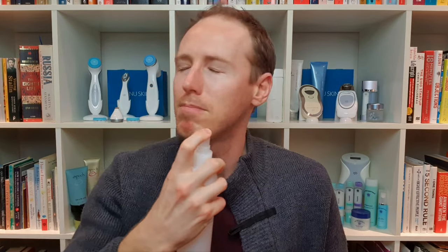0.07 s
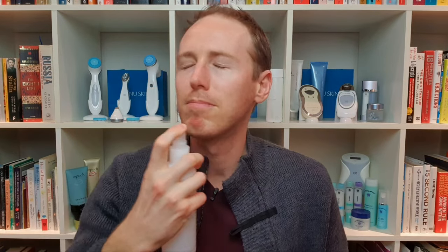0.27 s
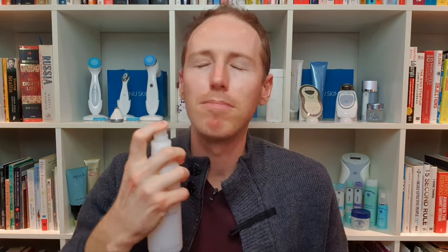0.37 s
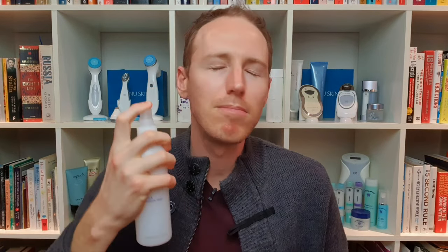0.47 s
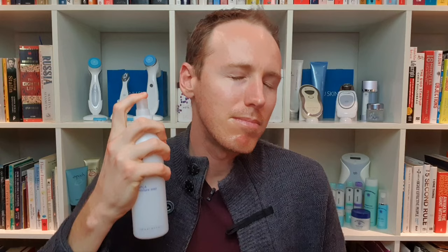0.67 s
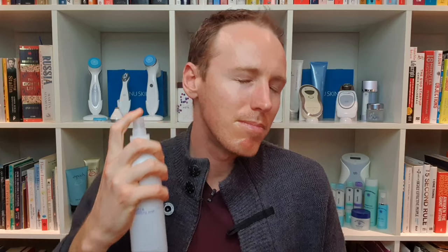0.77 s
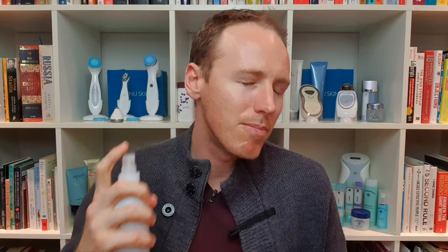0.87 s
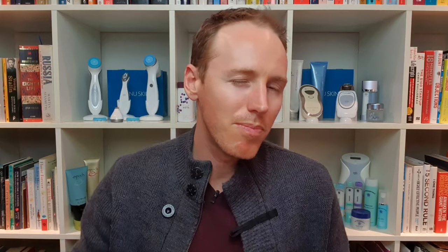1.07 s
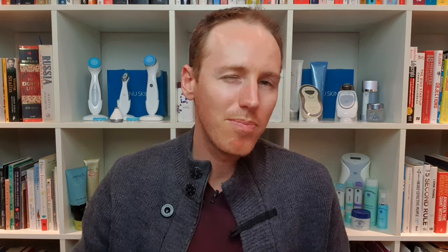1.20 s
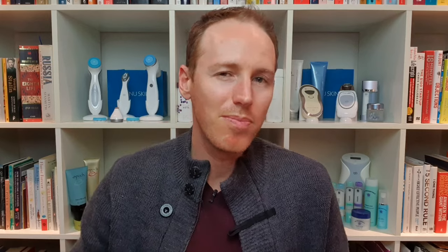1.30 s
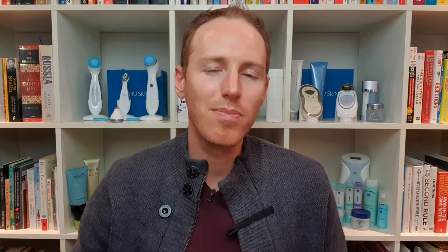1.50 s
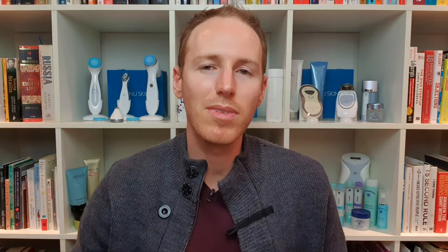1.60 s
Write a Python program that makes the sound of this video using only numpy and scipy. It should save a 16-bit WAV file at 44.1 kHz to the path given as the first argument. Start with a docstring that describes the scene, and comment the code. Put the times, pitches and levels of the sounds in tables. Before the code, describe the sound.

Close, nearly central pickup of a hand mist sprayer: short airy hisses, bright plastic knocks and tiny liquid plops in fast rhythm, then quiet cloth rubbing and light bottle taps, with slight small-room reverberation.

```python
"""Pump mist bottle, close by

Four quick strokes of mist, the first already under way, are shaped noise under a rising pressure curve.
The pump's knocks, clacks and clicks, the plopping liquid and ticks in the hand are sums of damped modes.
Then the arm is lowered: sleeve and sliding bottle are grainy noise, thin rising whistles are gliding sines.
A low rumble, still air and the decaying noise of a small room's reverberation surround them.
"""
import sys
import numpy as np
from scipy import signal
from scipy.fft import rfft, irfft
from scipy.io import wavfile
from scipy.ndimage import uniform_filter1d

SR = 44100
rng = np.random.default_rng(int(sys.argv[2]) if len(sys.argv) > 2 else 0)


def generate_wav(sig):
    """Save sig (samples, or channels by samples) to the path in sys.argv[1] as 16-bit PCM at SR."""
    pcm = np.round(np.clip(np.atleast_2d(sig).T, -1, 1) * 32767).astype(np.int16)
    wavfile.write(sys.argv[1], SR, pcm)


N = 72765
T = np.arange(N) / SR  # time in seconds
DECAY_60_DB = np.log(1000)  # exponent of a 60 dB fall


def undb(db):
    """Level law: decibels to amplitude gain."""
    return 10 ** (np.asarray(db) / 20)


def unit(x):
    """Normalization: scale to an rms of 1."""
    return x / np.sqrt(np.mean(x ** 2))


def along(points, hz):
    """Interpolation of (Hz, value) points on a logarithmic frequency axis."""
    point_hz, values = np.array(points, float).T
    return np.interp(np.log(np.maximum(hz, 1)), np.log(point_hz), values)


def tint(x, points):
    """Linear filtering: weight the spectrum by (Hz, dB) points."""
    hz = np.fft.rfftfreq(len(x), 1 / SR)
    return irfft(rfft(x) * undb(along(points, hz)), len(x))


def noise(points, grain_db=0):
    """Coloured noise of rms 1; random sample gains in dB make it a crowd of unequal specks."""
    white, size = rng.standard_normal((2, N))
    specks = white * undb(grain_db * size)
    return unit(tint(specks, points))


def curve(points):
    """Envelope: gain over time from (s, dB) points."""
    return undb(np.interp(T, *np.array(points).T))


def spread(mid, side, side_db):
    """Mid-side stereo: the side signal enters left and right with opposite signs."""
    return mid + undb(side_db) * side * np.array([[1], [-1]])


def knocks(events, modes):
    """Modal synthesis: each blow rings heavily damped modes of the plastic, brighter when it is hard."""
    pivot_hz, contact_s = 2000, 0.00005
    thin_hz = 331  # the small bottle radiates little bass
    out = np.zeros(N)
    for start, db, pitch, bright_db in events:
        first = int(start * SR)
        age = np.maximum(T[first:first + 4096] - start, 0)
        ring = 0
        for k, (hz, mode_db, t60) in enumerate(modes):
            tilt_db = bright_db * np.log2(hz / pivot_hz)
            size = (-1) ** k * undb(db + mode_db + tilt_db)  # neighbours swing opposite ways
            decay = np.exp(-DECAY_60_DB * age / t60)
            ring = ring + size * decay * np.sin(2 * np.pi * hz * pitch * age)
        onset = 1 - np.exp(-age / contact_s)
        out[first:first + len(age)] += ring * onset
    highpass = signal.butter(4, thin_hz, "high", fs=SR, output="sos")
    return signal.sosfilt(highpass, out)


# Colour of the still room. Each row: frequency in Hz, relative spectral level in dB.
AIR_COLOUR = [(30, -54), (250, -11), (400, 10), (700, 3), (1200, -1.5), (1750, 5.5), (2800, -1.5),
              (5000, -13), (9000, -9), (16000, -14.5)]


def still_air():
    """Stationary noise: a steady coloured hush, nearly the same on both sides."""
    level_db, side_db = -61.5, -24
    return undb(level_db) * spread(noise(AIR_COLOUR), noise(AIR_COLOUR), side_db)


# Low rumble of the moving body. Each row: time in seconds, level in dB before panning.
RUMBLE_LEVEL = [(0, -85), (.045, -63.5), (.2, -63), (.3, -70), (.5, -69), (.64, -71.5), (.8, -67),
                (.96, -71), (1.09, -66.5), (1.33, -79.5), (1.47, -82), (1.63, -72)]
# Colour of the rumble. Each row: frequency in Hz, relative spectral level in dB.
RUMBLE_COLOUR = [(20, -46), (45, -10), (75, -1), (140, 0.5), (250, 0.5), (500, -27.5)]


def body_rumble():
    """Amplitude modulation: movement raises and lowers a low noise in the microphone."""
    side_db, left_over_right_db = -12.5, 5.5
    rumble = curve(RUMBLE_LEVEL) * spread(noise(RUMBLE_COLOUR), noise(RUMBLE_COLOUR), side_db)
    return rumble * undb(np.array([[left_over_right_db], [-left_over_right_db]]) / 2)


# Faint rising whistles. Each row: start in seconds, length in seconds, first frequency in Hz,
# middle frequency in Hz, last frequency in Hz (all before the waver), level in dB before the flicker.
WHISTLES = [(.85, .13, 4100, 4450, 4600, -61), (1.14, .19, 3500, 4100, 4600, -62),
            (1.47, .10, 3650, 3650, 3900, -64.5), (1.55, .13, 3850, 4400, 4400, -60)]


def whistles():
    """Frequency modulation: thin tones glide upward, wavering in pitch and flickering in level."""
    waver_ratio, flicker_db = .032, 3  # rms depths
    slow_noise = unit(uniform_filter1d(rng.standard_normal(N), size=400))
    fast_noise = unit(uniform_filter1d(rng.standard_normal(N), size=50))
    waver = 1 + waver_ratio * fast_noise
    flicker = unit(undb(flicker_db * slow_noise))
    out = np.zeros(N)
    for start, length, from_hz, middle_hz, to_hz, db in WHISTLES:
        part = np.clip((T - start) / length, 0, 1)
        hz = np.interp(part, [0, .5, 1], [from_hz, middle_hz, to_hz]) * waver
        swell = np.sqrt(np.abs(np.sin(np.pi * part)))
        out += undb(db) * swell * np.sin(2 * np.pi * np.cumsum(hz) / SR)
    return out * flicker


CLOTH_GRAIN_DB = 6  # spread of the speck sizes
# Sleeve rubbing as the arm comes down. Each row: time in seconds, level in dB.
SLEEVE_LEVEL = [(.78, -57.5), (.87, -55), (.97, -60.5), (1.02, -51), (1.05, -59), (1.14, -52.5),
                (1.19, -61.5), (1.235, -57), (1.255, -54), (1.31, -70), (1.36, -63.5), (1.42, -61),
                (1.5, -63.5), (1.63, -57)]
# Colour of the cloth. Each row: frequency in Hz, relative spectral level in dB.
CLOTH_COLOUR = [(120, -64), (280, -2), (420, -13.5), (750, 0), (1200, -3), (1800, -1.5), (2800, -4.5),
                (5500, -6), (9000, -14), (15000, -25)]


def sleeve():
    """Friction noise: cloth rubbing on cloth is a crowd of unequal specks under a moving level."""
    return curve(SLEEVE_LEVEL) * noise(CLOTH_COLOUR, grain_db=CLOTH_GRAIN_DB)


# The bottle slides over cloth. Each row: start in seconds, length in seconds, peak level in dB.
SLIDES = [(1.10, .07, -65), (1.222, 0.088, -54), (1.294, 0.11, -54)]
# Colour of the slide. Each row: frequency in Hz, relative spectral level in dB.
SLIDE_COLOUR = [(1200, -29), (1900, -2.5), (2600, 1), (3600, -7), (8000, -14), (14000, -31)]


def slides():
    """Friction noise: short swishes of plastic on cloth swell and fade as half sines."""
    swell = np.zeros(N)
    for start, length, db in SLIDES:
        part = np.clip((T - start) / length, 0, 1)
        swell += undb(db) * np.sin(np.pi * part)
    return swell * noise(SLIDE_COLOUR, grain_db=CLOTH_GRAIN_DB)


# The bottle ticks in the hand. Each row: start in seconds, level in dB, pitch ratio,
# brightness in dB per octave.
TICKS = [(.0883, -42.5, 1.17, 2.5), (.9950, -29.5, 1.03, 0), (1.019, -43, 1.1, -5.5),
         (1.0655, -35, 0.97, -2), (1.2450, -32.5, 0.87, -1)]
# Modes of a tick. Each row: frequency in Hz at pitch ratio 1, relative level in dB, t60 in seconds.
TICK_MODES = [(457, -12.5, 0.021), (1790, -5.5, 0.0086), (3460, -8, 0.0085), (5660, -1, 0.0038),
              (8340, -9.5, 0.0029), (12400, -20, .004)]


def hand_ticks():
    """Impact excitation: light contacts ring the bottle's modes."""
    return knocks(TICKS, TICK_MODES)


# Liquid plops in the bottle. Each row: start in seconds, level in dB, pitch ratio,
# brightness in dB per octave.
PLOPS = [(.0255, -19, 0.96, -1.5), (.0337, -22.5, 1.06, 0.5), (.0625, -25.5, 0.77, 3),
         (.0945, -23.5, 1.0, 4), (.1357, -32, 0.97, -6), (.3255, -29, 1.02, 6), (.362, -32, 0.85, -6),
         (.548, -26.5, 1.32, -0.5), (.587, -31, 1.15, -6.5), (.718, -27, 1.44, 6), (.739, -23, 0.94, 0),
         (.7655, -29, 1.21, 1), (.7717, -23, 1.01, 9), (.7785, -21, 1.0, 0), (.783, -38, 0.79, -4),
         (.854, -37.5, 0.98, -3.5), (.9175, -35, 1.04, -4.5)]
# Modes of a plop. Each row: frequency in Hz at pitch ratio 1, relative level in dB, t60 in seconds.
PLOP_MODES = [(397, -16.5, 0.014), (1084, -6.5, 0.0092), (1770, -0.5, 0.0052), (2830, -4, 0.0072)]


def liquid_plops():
    """Damped resonance: each plop rings four short modes at its own pitch."""
    return knocks(PLOPS, PLOP_MODES)


# The spring throws the head back to its stop. Each row: start in seconds, level in dB, pitch ratio,
# brightness in dB per octave.
RETURNS = [(.1440, -13.5, 0.98, -0.5), (.3698, -13.5, 0.975, -1), (.5943, -17, 1.007, -1)]
# Modes of a return. Each row: frequency in Hz at pitch ratio 1, relative level in dB, t60 in seconds.
RETURN_MODES = [(443, -17, 0.01), (1177, -12.5, 0.0099), (2240, -3, 0.0092), (2800, -1, 0.0046),
                (5320, -5, 0.0057), (8200, -16, 0.0038), (13000, -22.5, 0.0022)]


def return_clicks():
    """Impact excitation: the head meeting its stop clicks in damped modes."""
    return knocks(RETURNS, RETURN_MODES)


# The finger lets go and the head rocks. Each row: start in seconds, level in dB, pitch ratio,
# brightness in dB per octave.
RELEASES = [(.2613, -2.5, 1.003, 0.5), (.4898, -4, 0.953, 1), (.7066, -6, 1.08, 0)]
# Modes of a release. Each row: frequency in Hz at pitch ratio 1, relative level in dB, t60 in seconds.
RELEASE_MODES = [(436, -21.5, 0.0091), (1104, -11.5, 0.01), (1720, -7.5, 0.0034), (2980, -4, 0.0035),
                 (4380, -3, 0.001), (8230, -15, 0.0026)]


def release_clacks():
    """Impact excitation: the rocking head clacks in short, bright modes."""
    return knocks(RELEASES, RELEASE_MODES)


# The piston hits bottom. Each row: start in seconds, level in dB, pitch ratio,
# brightness in dB per octave.
BOTTOMS = [(.2442, -2, 1.0, 1), (.4729, -1, 1.0, 0), (.6947, -5.5, 1, -1.5)]
# Modes of the hit. Each row: frequency in Hz at pitch ratio 1, relative level in dB, t60 in seconds.
BOTTOM_MODES = [(444, -21, 0.0051), (1146, -18, 0.025), (1596, -5.5, 0.018), (2019, -0.5, 0.0092),
                (3065, -3, 0.0037), (5110, -12, 0.004), (7540, -17.5, 0.0039), (9520, -21.5, 0.0047)]


def bottom_knocks():
    """Impact excitation: the stopped piston rings the modes of the pump."""
    return knocks(BOTTOMS, BOTTOM_MODES)


def bottle():
    """Early scattering: all knocks, with a short noise tail from face, hand and chest."""
    near_t60_s, near_db = 0.022, -10
    hits = bottom_knocks() + release_clacks() + return_clicks() + liquid_plops() + hand_ticks()
    scatter = rng.standard_normal(N) * np.exp(-DECAY_60_DB * T / near_t60_s) * (T > .002)
    scatter /= np.linalg.norm(scatter)
    return hits + undb(near_db) * signal.fftconvolve(hits, scatter)[:N]


# Strokes of mist. Each row: start in seconds, end in seconds, strength in dB re a full stroke.
SPRAYS = [(-.06, .016, -3), (.1690, .2445, .4), (.3940, .473, 0), (.619, .696, -.4)]
# Colour of the nozzle jet. Each row: frequency in Hz, relative spectral level in dB.
JET_COLOUR = [(200, -46), (400, -17), (750, -14.5), (1100, -5), (2050, -1), (3100, 0.5), (5200, -7),
              (6600, -12.5), (9500, -14), (11500, -19), (15000, -14), (16000, -29)]


def mist():
    """Jet noise: it opens sharply, grows with the finger's pressure and dies fast at the stroke's end."""
    full_stroke_db, rise_db_per_s, droplet_db = -32.5, 40, -1
    attack_s, release_s = 0.0054, 0.01
    flow = np.zeros(N)
    for start, end, db in SPRAYS:
        pressure_db = rise_db_per_s * (np.minimum(T, end) - end)  # reaches 0 at the end
        opening = np.clip((T - start) / attack_s, 0, 1)
        closing = np.exp(-np.maximum(T - end, 0) / release_s)
        flow += undb(full_stroke_db + db + pressure_db) * opening * closing
    return flow * noise(JET_COLOUR, grain_db=droplet_db)


# Reverberation time of the room. Each row: frequency in Hz, t60 in seconds.
ROOM_T60 = [(200, 0.15), (1000, 0.62), (2500, 0.29), (5500, 0.44), (9000, 0.5), (15000, 0.1)]
# Colour of the reverberation. Each row: frequency in Hz, relative level in dB.
ROOM_COLOUR = [(150, -8), (450, 3.5), (1500, -5.5), (3000, -3), (5500, 4), (8000, -2.5), (14000, 2.5)]


def room(x):
    """Diffuse reverberation: convolution with noise that decays at its own rate in each band."""
    delay_s, build_s = 0.0063, 0.0071
    hz, age, cells = signal.stft(rng.standard_normal(N), SR, nperseg=256)
    t60 = along(ROOM_T60, hz)[:, None]
    equal_energy = np.sqrt(2 * DECAY_60_DB / (t60 * SR))  # offsets the extra energy of long decays
    fade = np.exp(-DECAY_60_DB * age / t60) * equal_energy
    colour = undb(along(ROOM_COLOUR, hz))[:, None]
    tail = signal.istft(cells * fade * colour, SR)[1][:N]
    tail = tail * np.clip((T - delay_s) / build_s, 0, 1)
    return signal.fftconvolve(x, tail)[:N]


def scene():
    """Superposition: mist and bottle in the room, over cloth, whistles and still air, mostly central."""
    mist_room_db, click_room_db, room_side_db = -7.5, -8, -23
    hiss, hits = mist(), bottle()
    send = undb(mist_room_db) * hiss + undb(click_room_db) * hits
    reverberation = spread(room(send), room(send), room_side_db)
    background = still_air() + body_rumble() + whistles() + sleeve() + slides()
    return background + reverberation + hits + hiss


def record(dry):
    """Band limiting: the recorder cuts the top with a steep low-pass at 16250 Hz."""
    lowpass = signal.ellip(10, .2, 70, 16250, fs=SR, output="sos")
    return signal.sosfilt(lowpass, dry)


dry = scene()
out = record(dry)
generate_wav(out)
```